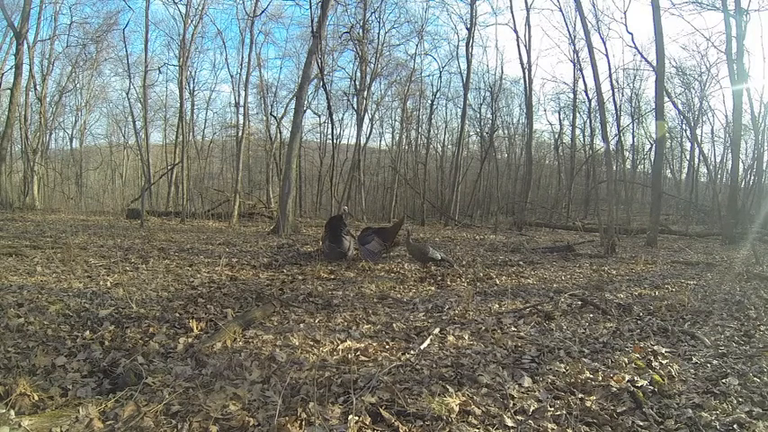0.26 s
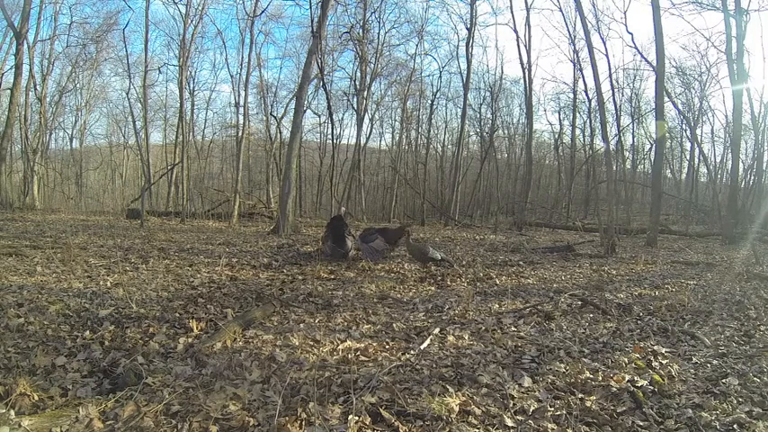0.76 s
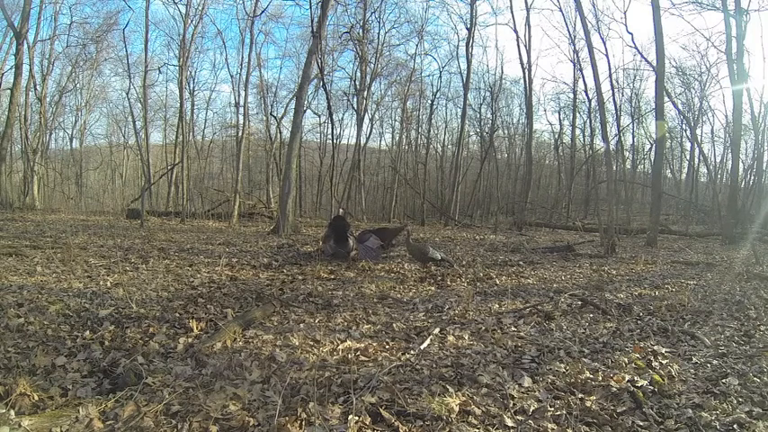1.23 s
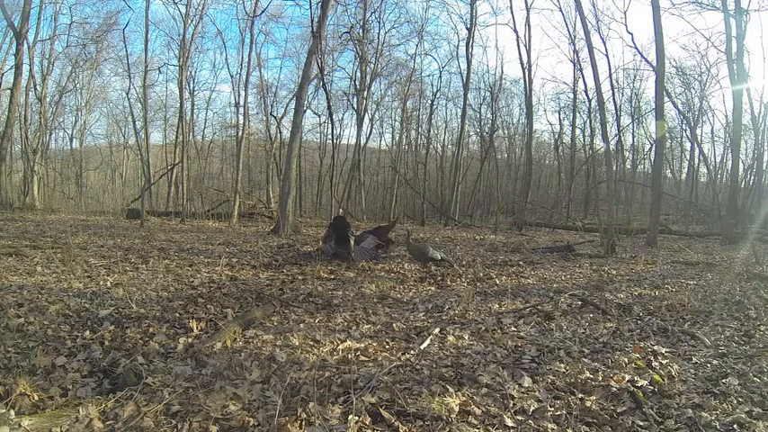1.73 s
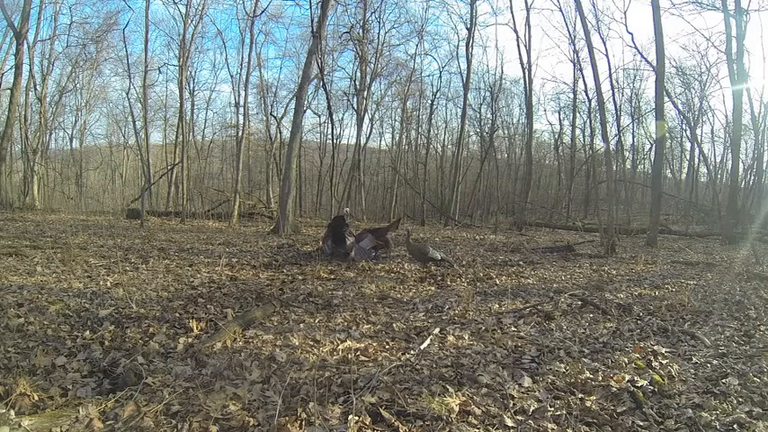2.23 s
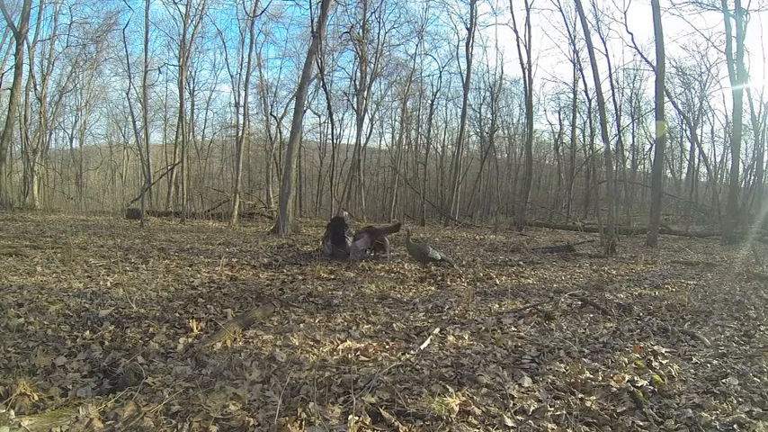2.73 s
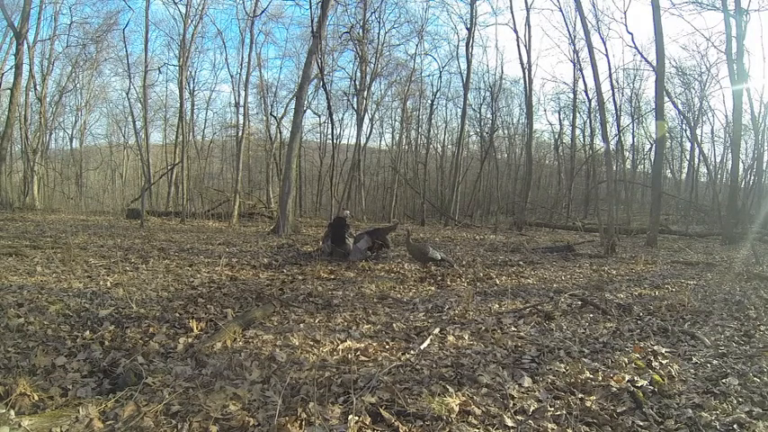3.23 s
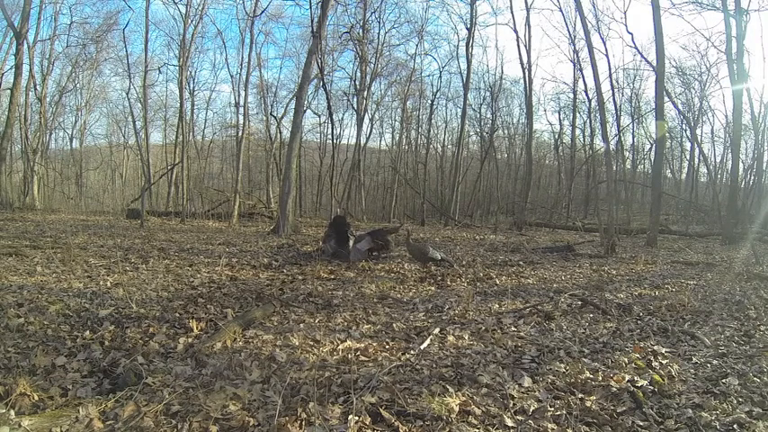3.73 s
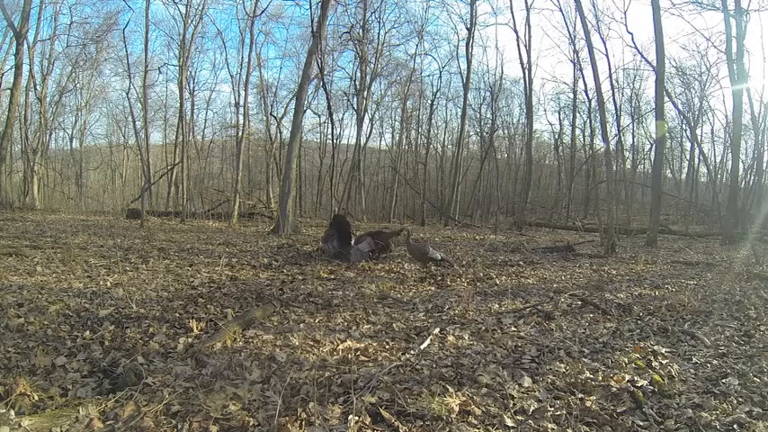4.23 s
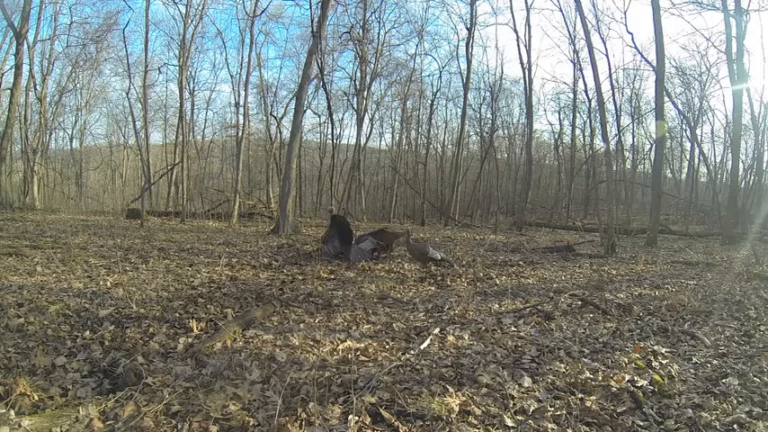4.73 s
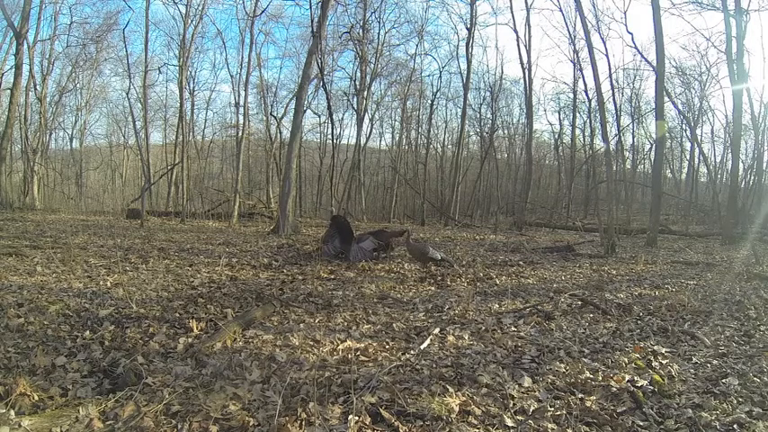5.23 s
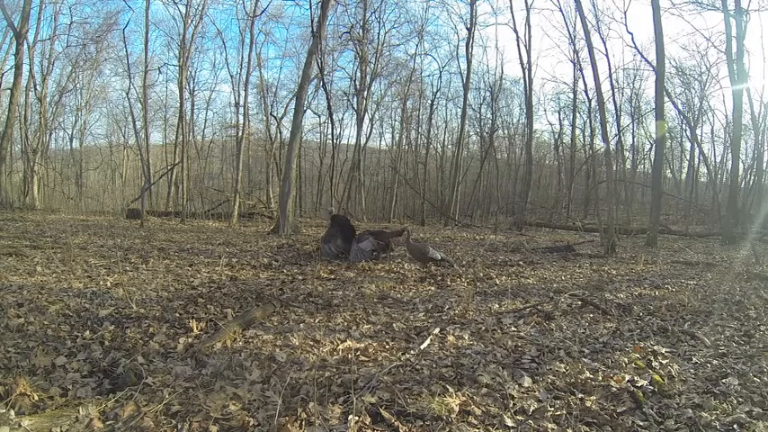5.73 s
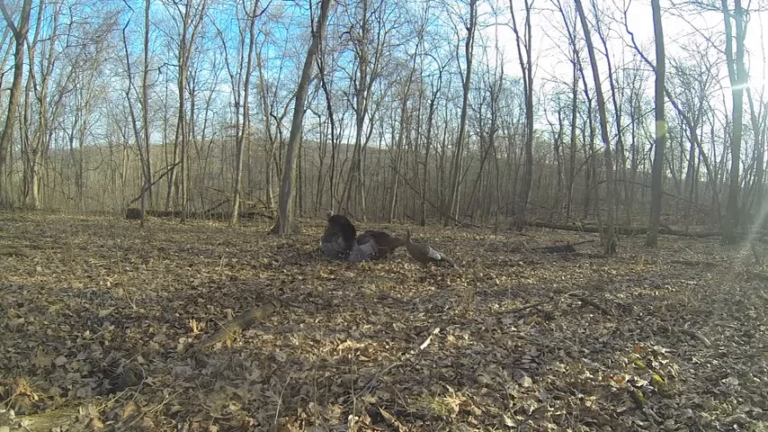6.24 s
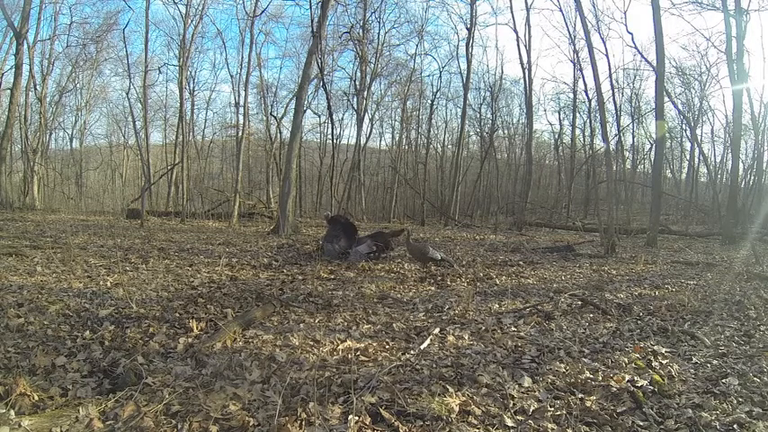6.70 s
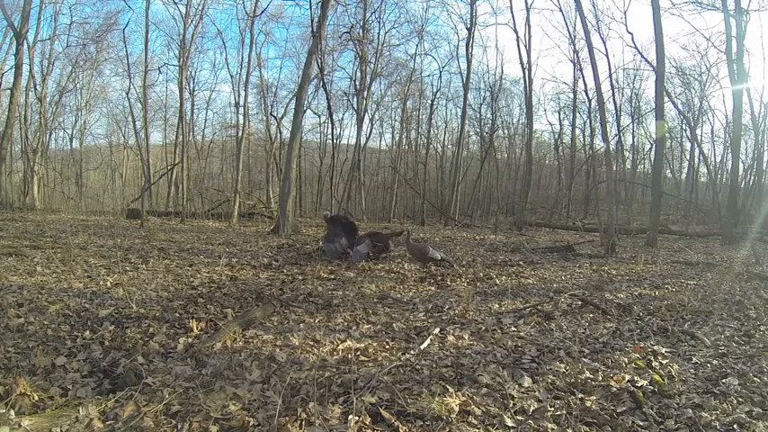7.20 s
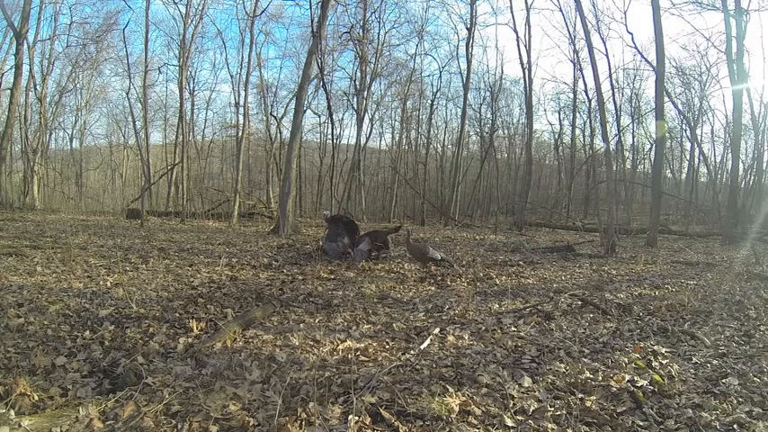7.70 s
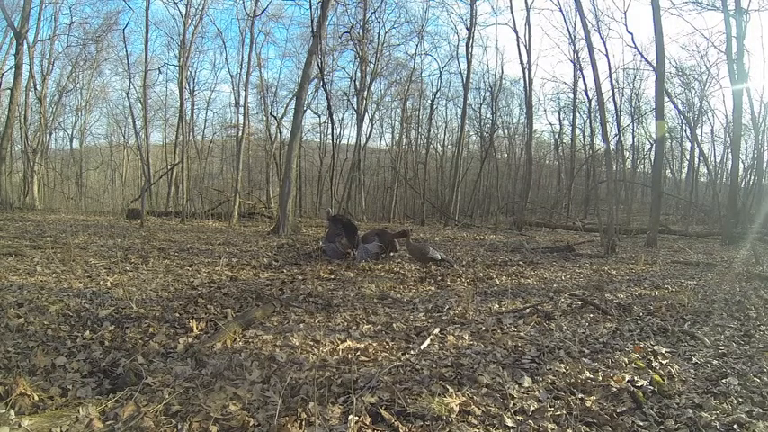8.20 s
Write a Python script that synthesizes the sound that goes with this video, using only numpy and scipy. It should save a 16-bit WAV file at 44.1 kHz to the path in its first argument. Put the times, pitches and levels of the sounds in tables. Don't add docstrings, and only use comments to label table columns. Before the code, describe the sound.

Wild turkeys scuffle on dry leaves in bare woods, dull hollow thumps and rustles growing busier, with purrs and late sharp clucks echoing.

```python
import sys
import numpy as np
from scipy import signal
from scipy.fft import rfft, irfft
from scipy.io import wavfile
from scipy.ndimage import uniform_filter1d

SR = 44100
rng = np.random.default_rng(int(sys.argv[2]) if len(sys.argv) > 2 else 0)


def transcribe(u):
    v = np.clip(np.atleast_2d(u).T, -1, 1)
    q = np.round(v * 32767).astype(np.int16)
    wavfile.write(sys.argv[1], SR, q)


def elevation(decibels):
    levels = np.asarray(decibels, float)
    return 10 ** (levels / 20)


N = 373086

# (time of the peak [s], peak level [dB], pitch [Hz], contact length [ms], slap level [dB])
WING_BLOWS = [(0.3063, -23.5, 101, 13.4, -36.5), (1.209, -28, 86, 34.3, -38),
              (1.6232, -22.5, 105, 7.6, -37), (2.066, -25, 88.5, 21, -36),
              (2.4564, -19.5, 101.5, 15.4, -38), (2.487, -29, 126.5, 29.6, -47),
              (3.201, -33.5, 120.5, 17.7, -39.5), (3.7726, -24.5, 100.2, 13.3, -37.5),
              (4.047, -28.5, 100, 19.7, -39.5), (4.3002, -28.5, 90, 20.5, -36.5),
              (4.7934, -25.5, 139, 8.3, -40), (4.885, -16.5, 121.5, 16.8, -33.5),
              (5.5212, -21, 90.4, 20, -40.5), (5.746, -18.5, 107, 11.6, -35.5),
              (5.778, -30.5, 135, 8.5, -38.5), (6.2066, -19.5, 80, 21.6, -34),
              (6.4621, -26, 111.6, 23, -43), (6.845, -20.5, 127, 5.6, -40), (6.928, -17, 106, 9.5, -38),
              (7.1595, -25, 181, 18, -40), (7.9866, -17, 95, 21.5, -41), (8.197, -29, 143, 9, -45),
              (8.343, -22.5, 104, 9.8, -41), (8.451, -17, 141, 4, -33.5)]
# (time of the peak [s], peak level [dB], pitch [Hz])
FOOT_STAMPS = [(.048, -35, 71.6), (0.5259, -34, 76), (0.7837, -28.5, 94), (2.183, -33, 80),
               (2.2207, -26.5, 87), (2.8073, -34, 119), (3.2492, -33.5, 103), (3.2711, -37, 131),
               (3.4677, -32.5, 132), (3.5548, -30.5, 108), (3.791, -34.5, 140), (4.1451, -26, 115),
               (4.3264, -28.5, 93), (4.506, -36, 108), (4.5616, -30.5, 102), (4.906, -24.5, 97),
               (5.0824, -36, 91), (5.1613, -33, 155), (5.805, -36, 89), (6.229, -26, 117),
               (6.4895, -24, 88), (6.899, -26, 104), (6.951, -26.5, 93), (7.373, -34, 88.2),
               (7.41, -24.5, 99), (7.6265, -30, 94), (8.07, -31, 109), (8.2317, -27.5, 151),
               (8.25, -32, 142), (8.3136, -27, 104), (1.636, -30, 62), (7.966, -31.5, 110),
               (.314, -26.5, 110), (2.078, -30, 90)]
SLAP_LEAD = .4


def colour(x, points):
    hz, db = np.transpose(points)
    f = np.maximum(np.fft.rfftfreq(len(x), 1 / SR), 1)
    gain = elevation(np.interp(np.log(f), np.log(hz), db))
    y = irfft(rfft(x) * gain, len(x))
    return y / np.sqrt(np.mean(y ** 2))


def band(x, lo_hz, hi_hz, order=2):
    sos = signal.butter(order, [lo_hz, min(hi_hz, .45 * SR)], "band", fs=SR, output="sos")
    return signal.sosfilt(sos, x)


def walk(rate, size=N):
    k = max(int(SR / rate), 1)
    held = np.repeat(rng.standard_normal(size // k + 1), k)
    return 1.58 * uniform_filter1d(uniform_filter1d(held, k), k)[:size]


def add(out, s, x):
    i = max(int(s * SR), 0)
    out[i:i + len(x)] += x[:N - i]


def body_hits():
    blows = [row[:4] for row in WING_BLOWS]
    return blows + [(s, db, hz, 9.68 - 0.95 * (db + 23.5)) for s, db, hz in FOOT_STAMPS]


def thumps():
    out = np.zeros(N)
    t = np.arange(-.03, .07, 1 / SR)
    for s, db, hz, ms in body_hits():
        half_s = ms / 2000
        since = np.maximum(t + SLAP_LEAD * ms * 0.000997, 0)
        swell = np.exp(-.5 * (t / half_s) ** 2)
        release = 1 / np.cosh(1.37 * t / half_s)
        first_push = 1 - np.exp(-since / (.15 * ms * 1e-3))
        swing = np.where(t < 0, swell, release) * first_push
        phase = 2 * np.pi * (hz * (since - 6.5 * since ** 2) - .17)
        body = np.cos(phase) + 0.22 * np.cos(2 * phase) + 0.12
        add(out, s + t[0], elevation(db + 2.5) * swing * body)
    return band(out, 23.4, 2000)


def knocks(rows, cycles, noise_db, spread, tail_s):
    out = np.zeros(N)
    t = np.arange(0, .04, 1 / SR)
    for s, db, hz in rows:
        ring = (1 - np.exp(-t * hz * 3)) * np.sin(2 * np.pi * hz * t) * np.exp(-t * hz / cycles)
        crush = band(rng.standard_normal(len(t)) * np.exp(-t / tail_s), hz, hz * spread)
        add(out, s, elevation(db) * (4.22 * ring + elevation(noise_db) * crush))
    return out


def feather_slaps():
    # (time [s], peak level [dB], pitch [Hz])
    further_slaps = [(1.032, -41.5, 470), (3.353, -47, 330), (4.004, -48, 366), (4.022, -45.5, 370),
                     (4.046, -46, 430), (5.127, -44, 360), (5.479, -34, 340), (5.504, -34, 363),
                     (6.91, -30, 318), (7.961, -40, 303), (8.327, -41, 290), (3.772, -45, 640),
                     (4.905, -42, 490), (5.775, -43.5, 410), (7.613, -42, 450), (7.9788, -32.5, 382),
                     (4.88, -47, 640), (.301, -39.5, 380), (7.15, -40, 420), (7.143, -46, 330),
                     (.304, -37, 200), (1.2, -36, 200), (2.487, -43.5, 960), (2.482, -37.5, 400),
                     (1.6185, -43, 620), (2.0605, -41, 560), (1.1975, -44.5, 640)]
    slap_db = [row[-1] for row in WING_BLOWS] + [db - 17 for _, db, _ in FOOT_STAMPS]
    pitches = 303 * np.exp(0.17 * rng.standard_normal(len(slap_db)))
    rows = list(further_slaps)
    for (s, _, _, ms), db, hz in zip(body_hits(), slap_db, pitches):
        rows.append((s - SLAP_LEAD * ms * 1e-3, db, hz))
    return knocks(rows, cycles=.9, noise_db=4, spread=4, tail_s=.0035)


def twig_snaps():
    # (time [s], peak level [dB], pitch [Hz])
    snap_rows = [(0.28, -51, 4130), (0.5165, -57, 2240), (1.0321, -43.5, 2850), (1.0687, -41.5, 4970),
                 (1.1827, -41, 3220), (2.0637, -36, 1930), (2.4794, -46, 2040), (4.2956, -54, 1560),
                 (5.2474, -49, 1860), (5.5039, -57, 2460), (5.7249, -46, 2650), (5.7407, -50, 2920),
                 (6.1963, -43, 3430), (6.8828, -53, 2350), (6.911, -36.5, 1520), (6.912, -35, 3000),
                 (6.9264, -36.5, 2320), (7.6036, -53, 1990), (7.9292, -38.5, 3300), (7.9605, -44, 2090),
                 (7.9688, -43, 3300), (7.9788, -35, 1300), (7.9795, -42.5, 3400), (5.48, -45, 1100),
                 (7.9887, -45, 1540), (3.955, -54, 2600), (4.022, -52, 3000), (4.047, -42, 900),
                 (3.7715, -42, 2700), (3.752, -49, 3600), (3.79, -48, 4200)]
    return knocks(snap_rows, cycles=.7, noise_db=-2, spread=3.5, tail_s=.001)


def calls(rows, partials_db, throat, rough, breath_db, rasp_db, attack, flick, sag_db, scoop):
    out = np.zeros(N)
    throat_hz, width_hz, lift_db = throat
    for s, length, early, middle, late, db in rows:
        u = np.linspace(-.1, 1.1, int(1.215 * length * SR))
        inside = np.clip(u, 0, 1)
        bend = np.polyfit([.125, .5, .875], [early, middle, late], deg=2)
        hz = np.polyval(bend, inside) * (1 + flick * inside ** 5)
        hz = hz * (1 - scoop * np.exp(-(u + 0.099) * length / .0025))
        hz = hz * (1 + 0.131 * rough * walk(503, size=len(u)))
        phase = 2 * np.pi * np.cumsum(hz) / SR
        tone = np.zeros(len(u))
        for k, partial_db in enumerate(partials_db):
            formant_db = lift_db * np.exp(-(((k + 1) * hz - throat_hz) / width_hz) ** 2)
            tone += elevation(partial_db + formant_db) * np.sin((k + 1) * phase + k)
        shape = np.clip(np.minimum((u + .06) / attack, (1.1 - u) / .2), 0, 1)
        shape = shape * elevation(-sag_db * np.clip(u + 0.071 - attack, 0, 1))
        puff = elevation(breath_db) * band(rng.standard_normal(len(u)), 330, 2900, order=1)
        rasp = band(rng.standard_normal(len(u)), throat_hz - width_hz, throat_hz + width_hz)
        puff += elevation(rasp_db) * rasp
        puff += elevation(breath_db - 21.5) * np.diff(rng.standard_normal(len(u) + 1))
        shake = elevation(4 * rough * np.clip(walk(300, size=len(u)), -2, .8))
        add(out, s - 0.11 * length, elevation(db) * np.sqrt(2) * shape * (tone * shake + puff))
    return out


def bent(row, bend):
    s, length, hz, db = row[:4]
    return s, length, hz * bend[0], hz, hz * bend[1], db


def slid(row):
    s, length, a, b, db = row
    done_halfway = 0.26 if b > a else 0.45
    return s, length, a, a + (b - a) * done_halfway, b, db


def clucks():
    # (time [s], length [s], pitch [Hz], level [dB], chest lift of the two lowest harmonics [dB])
    cluck_rows = [
        (6.0886, .02, 679.5, -29, 6.5),
        (6.343, 0.017, 712, -27.5, -1),
        (6.975, .026, 728, -33.5, 2.5),
        (7.235, 0.026, 699, -28.5, -0.5),
        (7.623, 0.0206, 667, -27, 3),
        (7.890, 0.016, 690, -27, -5),
        (8.206, .023, 661, -27.5, 2.5),
    ]
    # (early pitch [share of middle], late pitch [share of middle], fourth harmonic lift [dB], echo [dB])
    cluck_colour = [(.96, 1.052, 3.5, -15), (.98, 1.043, -6, -12.5), (1.03, 1.02, 6.5, -15),
                    (.99, 1.01, 3, -14), (.96, 1.043, -3.5, -13), (.95, 1.05, -8, -13),
                    (.96, 1.052, 3, -13.5)]
    # (closing flick [share of pitch], fall in level [dB])
    cluck_end = [(.1, 3.5), (.08, 2.5), (.13, 3.5), (.13, 6), (.08, 2.5), (.08, 2), (.08, 2.5)]
    cluck_rough = [.33, .12, .28, .16, .12, .12, .16]
    cluck_attack = [0.26, 0.48, .2, 0.18, 0.37, .5, 0.3]
    cluck_db = [-16, -25, -11, -21, -44, -25.5, -56, -31.5]
    low_pair = np.arange(len(cluck_db)) < 2
    fourth = np.arange(len(cluck_db)) == 3
    voices = []
    for row, tint, rough, attack, end in zip(cluck_rows, cluck_colour, cluck_rough, cluck_attack, cluck_end):
        early, late, fourth_db, echo_db = tint
        flick, sag_db = end
        partials_db = np.array(cluck_db) + row[-1] * low_pair + fourth_db * fourth
        voice = calls([bent(row, (early, late))], partials_db, throat=(2150, 380, 5.45), rough=rough,
                      breath_db=-14.5, rasp_db=-9, attack=attack, flick=flick, sag_db=sag_db, scoop=.16)
        voices.append((voice, echo_db))
    return voices


def yelps():
    # (time [s], length [s], pitch [Hz], level [dB], pitch before the break [share])
    yelp_rows = [
        (6.523, .027, 1154, -40, .79),
        (6.713, .039, 1022, -40, 1.0),
    ]
    yelp_rough = [.25, .7]
    yelp_db = [-1, -14, -25, -20, -35]
    break_s, bend = .011, (0.97, 1.008)
    voices = []
    for (s, length, hz, db, low), rough in zip(yelp_rows, yelp_rough):
        before = bent((s, break_s, hz * low, db - 0.5), bend)
        after = bent((s + break_s, length - break_s, hz, db), bend)
        voice = calls([before, after], yelp_db, throat=(2340, 310, 12.8), rough=rough, breath_db=-10,
                      rasp_db=2.5, attack=0.16, flick=.01, sag_db=2.5, scoop=.04)
        voices.append((voice, -15))
    return voices


def purrs_and_whines():
    # (time [s], length [s], pitch [Hz], level [dB], rise [share of pitch])
    purr_rows = [(1.886, 0.032, 663, -49.5, .1), (1.953, 0.016, 668, -45.5, .07),
                 (2.0113, 0.017, 657, -43, 0.065), (2.069, 0.02, 620, -42.5, 0.086),
                 (2.124, .015, 629, -42.5, 0.045), (2.174, 0.016, 617, -44, 0.037),
                 (2.224, .012, 677, -54, 0.05), (2.263, 0.017, 603, -45, 0.04),
                 (2.336, 0.013, 534, -45.5, -0.019), (4.589, 0.026, 636, -49, 0.013),
                 (5.435, 0.014, 600, -49.5, .04), (5.6152, 0.024, 603, -46, .1),
                 (5.682, .026, 639, -43.5, 0.072), (5.746, 0.018, 616, -51, 0.082),
                 (5.7997, 0.015, 624, -47, 0.09), (5.852, 0.013, 633, -48.5, 0.036),
                 (5.898, 0.015, 765, -56.5, .01), (5.977, 0.021, 780, -55, .01)]
    # (time [s], length [s], pitch from [Hz], pitch to [Hz], level [dB])
    whine_rows = [(0.394, 0.022, 647, 854, -46.5), (0.412, 0.024, 920, 664, -41.5),
                  (0.435, .019, 600, 570, -45.5), (0.487, 0.017, 1000, 674, -39),
                  (.437, .015, 1210, 1150, -68), (.508, .016, 900, 860, -54),
                  (0.725, 0.03, 1153, 1100, -66), (.765, .03, 1030, 950, -64), (0.802, .03, 902, 870, -61),
                  (0.851, .038, 958, 844, -55.5), (0.948, 0.024, 527, 460, -59),
                  (.952, 0.013, 1085, 1020, -52.5), (1.032, 0.011, 498, 517, -41.5),
                  (1.801, 0.047, 639, 630, -55.5), (1.845, 0.039, 599, 541, -51.5),
                  (2.299, 0.0197, 750, 820, -56), (3.942, 0.04, 962, 870, -60),
                  (4.736, .014, 960, 965, -57), (4.759, 0.017, 936, 950, -56),
                  (4.785, 0.0158, 986, 990, -54.5), (6.972, 0.0092, 1055, 955, -42.5),
                  (4.62, .012, 980, 1030, -59), (4.822, .04, 679, 500, -55), (4.878, .016, 1000, 1110, -58),
                  (4.911, 0.013, 1070, 1060, -58), (7.521, 0.0099, 740, 800, -44.5),
                  (7.537, 0.019, 1010, 1019, -56), (7.886, 0.012, 960, 1000, -46),
                  (8.0427, 0.017, 750, 530, -52)]
    purr_db = [0, -27]
    rows = [bent(row, (1 - row[-1], 1 + row[-1])) for row in purr_rows]
    rows += [slid(row) for row in whine_rows]
    return calls(rows, purr_db, throat=(1246, 109, 16.9), rough=0.19, breath_db=-17.0, rasp_db=-22,
                 attack=0.24, flick=0.026, sag_db=0.5, scoop=0.054)


def rattle():
    # (time [s], length [s], lowest pitch [Hz], late pitch [Hz], level [dB])
    hook_rows = [
        (.5445, .0138, 557, 930, -37),
        (.596, .0085, 760, 1030, -44),
        (.633, .011, 640, 980, -35.5),
        (.650, .008, 780, 1050, -50),
        (.566, .008, 780, 1020, -52),
    ]
    rows = [(s, n, lo * 1.126, lo, hi, db) for s, n, lo, hi, db in hook_rows]
    return calls(rows, [0, -12], throat=(2300, 800, -30), rough=.1, breath_db=-22, rasp_db=-40,
                 attack=.75, flick=.05, sag_db=0, scoop=.01)


def litter():
    # (time of the peak [s], level [dB], brightness [dB], length [ms])
    scuff_rows = [(.143, -76, 8, 67), (.281, -66, -19, 23), (.519, -65, -10.7, 16), (6.995, -60, 4, 39),
                  (1.069, -67, 4, 28), (1.186, -63, 0, 92), (1.621, -67, 2, 54), (1.95, -64.5, -8, 42),
                  (2.066, -52.5, -33, 11), (2.459, -60, -6, 27), (3.122, -66.5, 8.5, 59),
                  (3.248, -62.5, 1, 72), (3.77, -56, 3.5, 60), (4.01, -65.5, -4, 58),
                  (4.297, -65.5, -3, 57), (4.662, -63, -8.2, 13.7), (4.896, -65, -9, 130),
                  (5.506, -61, -3, 66), (5.746, -53, -36, 18), (6.199, -60, -4, 140), (6.62, -65.5, 3, 29),
                  (6.924, -50, -30, 19), (7.092, -64, -6, 180), (7.344, -61, 5, 36), (7.398, -62, 9, 14),
                  (7.45, -64.5, 3, 21), (7.673, -63, 1.5, 80), (7.855, -61.5, 5, 115),
                  (7.97, -57.5, -13, 57), (8.113, -60, 1.75, 47)]
    # (frequency [Hz], density [dB per Hz])
    leaf_spectrum = [(300, 0), (600, 14), (1200, 6.5), (2200, 3.5), (3700, 7), (6000, -1), (8000, -11),
                     (12000, -13), (15500, -26)]
    rows = list(scuff_rows)
    rows += [(s, db - 42.5, -1.5, 48) for s, db, _ in FOOT_STAMPS]
    grain_size = elevation(3.1 * np.minimum(rng.exponential(size=N), 5))
    crackle = rng.standard_normal(N) * grain_size * elevation(2 * walk(200))
    leaves = colour(crackle, leaf_spectrum)
    top = signal.sosfiltfilt(signal.butter(2, 7500, "high", fs=SR, output="sos"), leaves)
    push, dryness = np.zeros((2, N))
    t = np.arange(-.14, .2, 1 / SR)
    for s, db, bright_db, ms in rows:
        swell = elevation(db + 7) * np.exp(-np.sqrt((t / (ms / 1400)) ** 2 + .02))
        add(push, s + t[0], swell)
        add(dryness, s + t[0], swell * elevation(bright_db + 8.5))
    return push * (leaves - top) + dryness * top


def songbirds(glides):
    out = np.zeros(N)
    for rows in glides:
        s, hz, db = np.transpose(rows)
        t = np.arange(s[0], s[-1], 1 / SR)
        tone = np.sin(2 * np.pi * np.cumsum(np.interp(t, s, hz)) / SR)
        level = elevation(np.interp(t, s, db) + 1.6 * walk(67, size=len(t)))
        add(out, s[0], np.sqrt(2) * level * signal.windows.tukey(len(t), .15) * tone)
    return out


def whistles():
    # (time into the whistle [s], pitch [Hz], level [dB])
    whistle_shape = [
        (0, 2760, 2),
        (.018, 2450, -3.5),
        (.049, 2200, -3.5),
        (.073, 2300, -20),
        (.095, 2110, -6),
        (.135, 1860, 1),
        (0.183, 1642, -7.5),
        (.26, 1417, -13),
    ]
    # (time [s], stretch [factor], level [dB])
    whistle_times = [
        (1.883, 1.0, -56.5),
        (2.317, 0.97, -54),
        (2.752, 1.02, -55),
    ]
    return songbirds([[(s + stretch * u, hz, db + d) for u, hz, d in whistle_shape]
                      for s, stretch, db in whistle_times])


def chirps():
    chirp_rows = [(1.125, 0.029, 2590, 2450, -65), (1.445, 0.04, 3200, 2830, -67),
                  (1.486, .05, 2780, 2680, -65), (1.555, 0.026, 2650, 2300, -65),
                  (1.579, .022, 2290, 1500, -60), (5.925, 0.065, 3970, 2800, -68),
                  (6.156, 0.049, 3350, 3600, -59.5), (6.31, 0.037, 2720, 3080, -60),
                  (6.483, 0.074, 3450, 3650, -61.5), (.672, .014, 3100, 3050, -64),
                  (.765, .018, 2460, 2460, -68), (4.093, .018, 4200, 4150, -68),
                  (5.809, .03, 4850, 4720, -71), (8.043, .016, 1580, 1000, -54)]
    return songbirds([[(s, a, db), (s + n / 2, a + (b - a) * .7, db), (s + n, b, db)]
                      for s, n, a, b, db in chirp_rows])


def trunks(x, onset_s, near_t60_s, far_t60_s, far_db, db):
    t = np.arange(int(.9 * SR)) / SR
    fade = elevation(-60 * t / near_t60_s) + elevation(far_db - 60 * t / far_t60_s)
    tail = rng.standard_normal(len(t)) * fade * np.clip(t / onset_s - .4, 0, 1)
    tail = band(tail, 176, 1440, order=1)
    blur = elevation(2.4 * walk(700))
    return elevation(db) * blur * signal.fftconvolve(x, tail / np.sqrt(np.sum(tail ** 2)))[:N]


def earlier_cluck():
    t = np.arange(N) / SR
    return elevation(-37 - 54 * t) * band(rng.standard_normal(N), 2090, 2210)


def air():
    # (frequency [Hz], density [dB per Hz])
    air_spectrum = [(12, -47), (20, -1), (49, 4.5), (80, 1), (289, -15.5), (614, -21), (1450, -28.5),
                    (4070, -32.5), (4950, -31.5), (7520, -41.5), (9930, -39), (11400, -44.5), (13100, -39),
                    (14300, -42), (15500, -42)]
    # (time [s], level [dB])
    breeze_rows = [(0.0, -50), (0.42, -46.5), (1.51, -48.5), (1.74, -44.5), (2.28, -47), (2.99, -47.5),
                   (3.32, -46.5), (4.92, -45), (5.44, -46.5), (5.63, -45.5), (6.74, -49), (6.93, -44.5),
                   (8.01, -47), (8.1, -48), (8.46, -46.5)]
    t = np.arange(N) / SR
    bed = colour(rng.standard_normal(N), air_spectrum) * elevation(-46.5)
    low = signal.sosfiltfilt(signal.butter(2, 260, fs=SR, output="sos"), bed)
    top = signal.sosfiltfilt(signal.butter(2, 8000, "high", fs=SR, output="sos"), bed)
    buzz = np.exp(3 * (np.cos(2 * np.pi * (59.94 * t + 0.099)) - 1))
    gust_s, level_db = np.transpose(breeze_rows)
    gust_db = np.interp(t, gust_s, level_db)
    gust_db = gust_db - np.mean(gust_db) + 0.55 + 1.8 * walk(14)
    drift = elevation(.3 * walk(3))
    return (bed - low + .5 * buzz * top) * drift + low * elevation(gust_db)


def scene():
    voices = clucks() + yelps()
    purrs = purrs_and_whines() + rattle()
    knocking = feather_slaps() + twig_snaps()
    far_bird, near_birds = whistles(), chirps()
    echoes = earlier_cluck()
    for voice, echo_db in voices:
        echoes += trunks(voice, onset_s=0.0046, near_t60_s=0.35, far_t60_s=1.23, far_db=-6.5, db=echo_db - 1.0)
    echoes += trunks(purrs, onset_s=.012, near_t60_s=.07, far_t60_s=.8, far_db=-20, db=-24)
    echoes += trunks(knocking, onset_s=0.012, near_t60_s=0.14, far_t60_s=0.97, far_db=-23, db=-21)
    echoes += trunks(far_bird + elevation(-2) * near_birds, onset_s=0.014, near_t60_s=0.88, far_t60_s=3.8,
                     far_db=-20, db=-6.5)
    turkeys = thumps() + knocking + sum(voice for voice, _ in voices) + purrs + litter()
    return (turkeys + far_bird + near_birds + echoes + air())[None]


def band_limit(x):
    return signal.sosfilt(signal.butter(12, 15770, fs=SR, output="sos"), x)


def record(dry):
    cut = signal.ellip(10, .2, 70, 15280, fs=SR, output="sos")
    mix = signal.sosfilt(cut, dry)
    return band_limit(mix)


dry = scene()
out = record(dry)
transcribe(out)
```